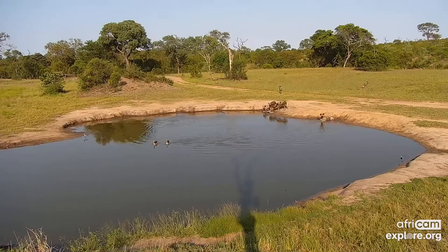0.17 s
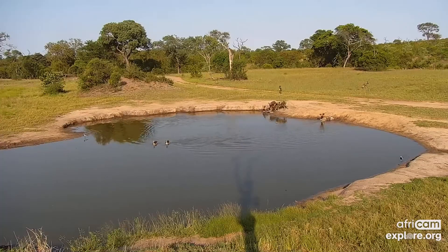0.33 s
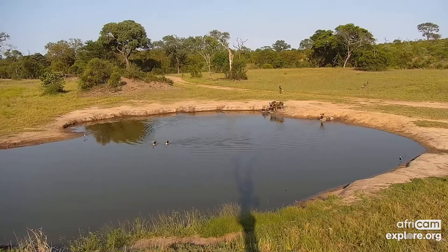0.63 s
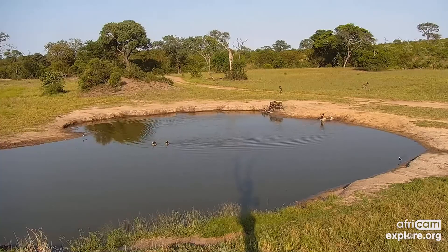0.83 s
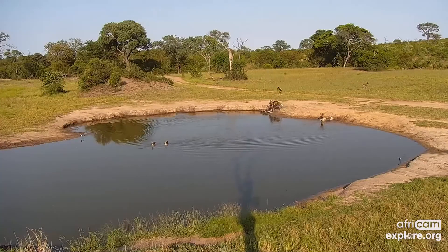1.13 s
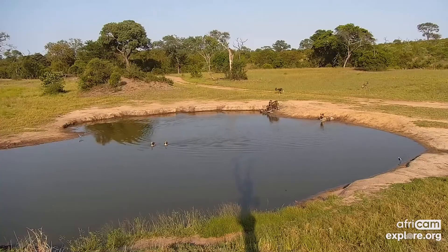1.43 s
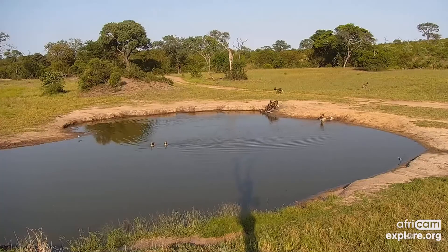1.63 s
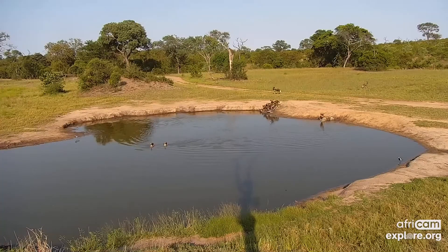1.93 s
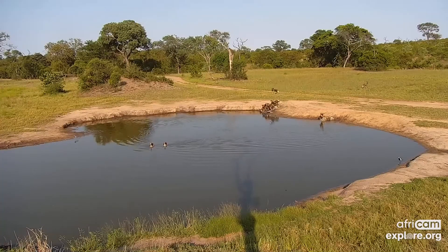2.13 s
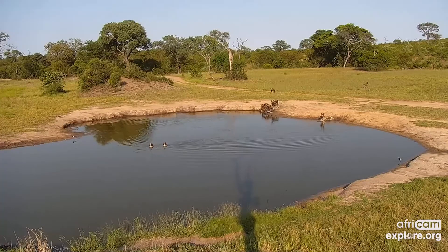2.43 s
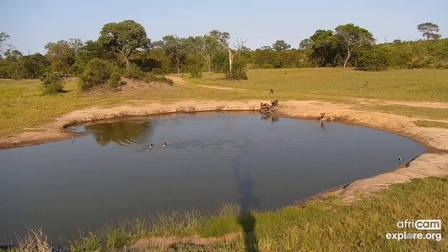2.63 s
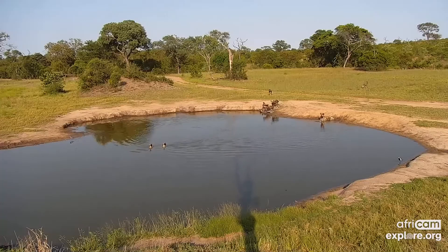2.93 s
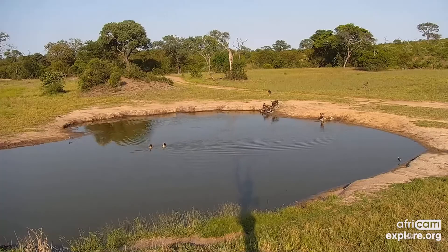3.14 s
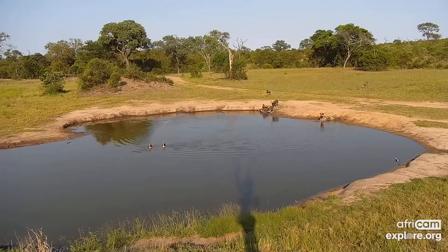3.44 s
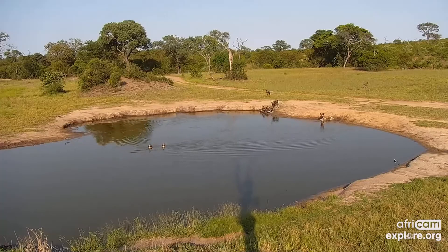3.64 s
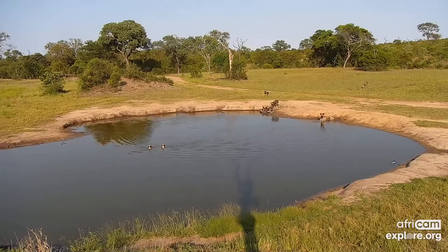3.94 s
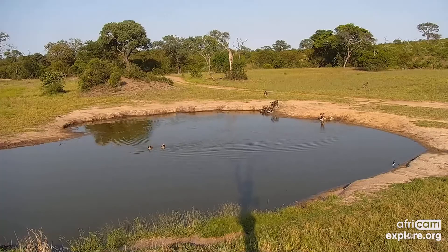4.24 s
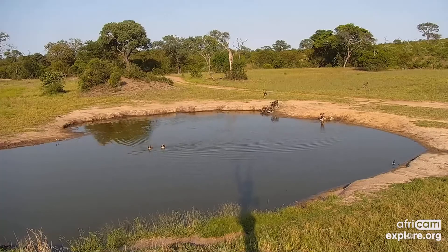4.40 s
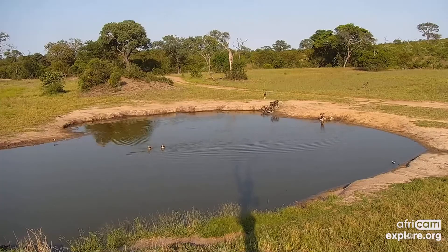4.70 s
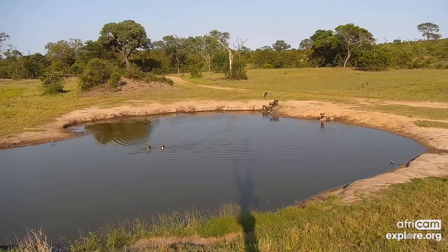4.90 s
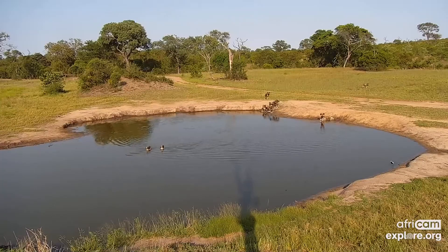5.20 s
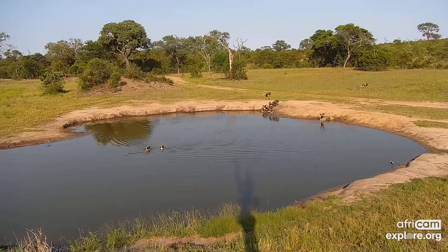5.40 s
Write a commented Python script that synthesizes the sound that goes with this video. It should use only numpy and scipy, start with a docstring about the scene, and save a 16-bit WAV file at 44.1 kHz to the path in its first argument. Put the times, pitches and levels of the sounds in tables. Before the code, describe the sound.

Wild dogs twitter far off at a waterhole, with rustling, splashy clicks, drips and high whistles over a steady low hum.

```python
"""Rustling, splashy clicks and thin chirps: a pack of wild dogs at a waterhole, on a distant microphone.
Bubbles ring as drips, a hoarse squeal passes, and far twitter runs throughout. Three falling whistles
and a raspy trill follow, then three long high whistles and a low croak. Ground and water scatter a thin
echo of the short sounds; the cable adds mains hum, low rumble and hiss."""
import sys
import numpy as np
from scipy import signal
from scipy.fft import rfft, irfft
from scipy.io import wavfile
from scipy.ndimage import uniform_filter1d

SR = 44100
rng = np.random.default_rng(int(sys.argv[2]) if len(sys.argv) > 2 else 0)


def dump_mix(stems):
    """Bounce the given channels to the path in sys.argv[1] as a 16-bit WAV at rate SR."""
    frames = np.atleast_2d(stems).T  # one column per channel
    limited = np.clip(frames, -1, 1)  # hard clip at full scale
    pcm = np.round(limited * 32767).astype(np.int16)
    wavfile.write(sys.argv[1], SR, pcm)


N = 245189

# stir of grass and water around the pack: t/s, level/dB
RUSTLE_LEVEL = [(0, -47), (.15, -52), (.32, -62), (.38, -55), (.66, -55.5), (.72, -67), (1.1, -63),
                (1.3, -63), (1.85, -67.5), (2.0, -64.5), (2.62, -68), (2.85, -59.5), (2.95, -63),
                (3.5, -59.5), (3.7, -70), (4.0, -68), (4.55, -63.5), (5.56, -68)]
# colour that the microphone gives to broad sounds: f/Hz, gain/dB
MIC_COLOUR = [(300, -26), (700, -13), (1500, -13.5), (2800, -12), (3400, -8), (3750, 0), (4300, -5.5),
              (5500, -6.5), (7000, -10.5), (7700, -24.5), (11000, -30.5)]


def gain_of(db):
    return 10 ** (np.asarray(db) / 20)


def unit_rms(x):
    return x / np.sqrt(np.mean(x ** 2) + 1e-20)


def add(mix, start_s, sound):
    part = mix[round(start_s * SR):][:len(sound)]
    part += sound[:len(part)]


def sine(hz):
    return np.sin(2 * np.pi * np.cumsum(hz) / SR)


def coloured(x, spectrum):
    """Filters x by a spectrum: f/Hz, gain/dB."""
    bins = np.fft.rfftfreq(len(x), 1 / SR) + 1
    hz, db = np.transpose(spectrum)
    return irfft(rfft(x) * gain_of(np.interp(np.log(bins), np.log(hz), db)), len(x))


def resonate(x, hz, width_hz):
    """A resonance: shifts hz down to zero, smooths, and shifts back."""
    turn = np.exp(2j * np.pi * np.cumsum(hz * np.ones(len(x))) / SR)
    pole = np.exp(-np.pi * width_hz / SR)
    return 2 * (turn * signal.lfilter([1 - pole], [1, -pole], x / turn)).real


def narrow_noise(hz, width_hz):
    """Noise through a resonance twice: a fuzzy whistle on the curve hz."""
    once = resonate(rng.standard_normal(len(hz)), hz, width_hz)
    return unit_rms(resonate(once, hz, width_hz))


def wander(count, span):
    """Smooth random drift of rms 1 that changes within span samples."""
    return unit_rms(uniform_filter1d(uniform_filter1d(rng.standard_normal(count), span), span))


def grains(count, spread_db, limit):
    """Gritty noise: each sample gets a random boost of up to limit times spread_db."""
    return gain_of(spread_db * np.minimum(rng.exponential(1, count), limit)) * rng.standard_normal(count)


def unfold(contour):
    """Turns rows of t/s, f/Hz, level/dB into a start time, a pitch curve and a gain curve."""
    times, hz, db = np.transpose(contour)
    t = np.arange(times[0], times[-1], 1 / SR)
    return times[0], np.interp(t, times, hz), gain_of(np.interp(t, times, db))


def glide(length_s, first_hz, last_hz, db, waver, rasp_db=2.7):
    """A short sliding tone whose pitch and level tremble."""
    count = round(length_s * SR)
    hz = np.linspace(first_hz, last_hz, count) * (1 + waver * wander(count, 40))
    return gain_of(db + rasp_db * wander(count, 60)) * signal.windows.tukey(count, .6) * sine(hz)


def sing(hz, level, flutter_db):
    """A tone on a pitch curve whose level flutters."""
    return np.sqrt(2) * level * gain_of(flutter_db * wander(len(hz), 150)) * sine(hz)


def rustle():
    """Grass and water crackle in lumps; the louder, nearer rustle breaks into snaps."""
    db = np.interp(np.arange(N) / SR, *np.transpose(RUSTLE_LEVEL))
    crackle = grains(N, spread_db=1.9, limit=5)
    snap_db = np.interp(db, [-62, -56], [2.2, 3.2])
    lumps = gain_of(snap_db * wander(N, 120) + 1.8 * wander(N, 900))
    return unit_rms(coloured(crackle * lumps, MIC_COLOUR)) * gain_of(db)


def cable(mains_hz=50.135):
    """The microphone line: mains hum with odd overtones, a wavering second harmonic, rumble and hiss."""
    # mains harmonics: multiple, rms level/dB
    harmonics = [(1, -45), (3, -64), (5, -85), (7, -84)]
    # rumble and hiss: f/Hz, density/(dB per Hz)
    noise_floor = [(20, -104), (40, -86), (65, -71), (100, -79), (140, -89), (180, -92), (260, -106),
                   (420, -102), (1000, -102), (2000, -104), (4000, -105), (7500, -106), (10800, -101)]
    t = np.arange(N) / SR
    hum = sum(np.sqrt(2) * gain_of(db) * np.sin(2 * np.pi * (k * mains_hz * t + rng.random()))
              for k, db in harmonics)
    second = gain_of(-66.5) * narrow_noise(np.full(N, 2 * mains_hz), width_hz=2)
    return hum + second + coloured(rng.standard_normal(N), noise_floor) * np.sqrt(SR / 2)


def far_twitter(count=400):
    """Dogs farther off: a blur of faint chirps whose level loosely follows the rustle."""
    out = np.zeros(N)
    for when, length, pitch, bend, loud in rng.random((count, 5)):
        start = when * N / SR
        hz = 3450 + 1500 * pitch ** 1.8
        rustle_db = np.interp(start, *np.transpose(RUSTLE_LEVEL))
        db = np.clip(rustle_db, -66, -61) - 5.5 + 5 * loud
        add(out, start, glide(.0072 + .0444 * length, hz, hz + 400 * (bend - .5), db, waver=.032))
    return out


def clicks(crest_factor=1.9):
    """Paws and water click and slap: scatters of noise grains that swell and die, with a faint tail."""
    # impacts: t/s, nominal peak level/dB, length/s, centre f/Hz
    impacts = [(.008, -29, 0.0051, 3020), (0.078, -33, 0.0029, 4950), (.119, -21.5, 0.0041, 4200),
               (0.127, -34.5, 0.012, 2370), (0.289, -34, 0.012, 5840), (0.306, -35, .005, 5600),
               (0.335, -38, 0.0067, 3400), (0.356, -39, 0.0052, 4500), (0.451, -45, 0.0065, 4500),
               (0.628, -37, 0.0078, 4300), (1.432, -42, 0.0041, 4500), (2.565, -49.5, 0.0047, 1500),
               (3.336, -45, 0.007, 2300), (4.759, -46.5, 0.011, 3500), (5.134, -45, 0.011, 4700)]
    out, t = np.zeros(N), np.arange(3000) / SR
    for start, db, length, hz in impacts:
        swell = np.exp(-((t / length - .5) / .52) ** 2)
        envelope = swell + .1 * np.tanh(t / length) * np.exp(-t / .018)
        grit = coloured(grains(len(t), spread_db=5, limit=4), MIC_COLOUR)
        burst = envelope * (unit_rms(resonate(grit, hz, width_hz=2100)) + .29 * unit_rms(grit))
        rms = gain_of(db) * np.sqrt(np.mean(envelope ** 2)) / crest_factor
        add(out, start, rms * unit_rms(burst))
    return out


def slides():
    """Short sliding tones: thin high chirps, a low call and two longer rising water drips."""
    # tones: t/s, length/s, first f/Hz, last f/Hz, level/dB
    tones = [(0.023, 0.022, 877, 1190, -49), (0.587, 0.021, 1000, 1290, -59),
             (0.546, 0.018, 6640, 7060, -55), (0.584, 0.014, 4480, 4650, -44),
             (0.132, .017, 3650, 3730, -41), (0.479, 0.0074, 3550, 3700, -45.5),
             (.514, .013, 3600, 3640, -46.5), (.599, .008, 3900, 3550, -43.5),
             (0.799, 0.054, 4000, 3944, -58), (0.86, 0.06, 4300, 4550, -62.5),
             (0.864, 0.045, 3350, 3380, -65.5), (0.946, 0.039, 3740, 3760, -60),
             (0.957, 0.036, 4930, 4620, -59.5), (0.98, 0.057, 3950, 4020, -56),
             (1.034, 0.05, 4330, 4400, -57.5), (1.075, 0.045, 4540, 4330, -58),
             (1.365, 0.035, 4063, 3630, -59), (2.556, 0.0093, 3690, 3640, -52.5),
             (2.615, 0.079, 910, 880, -66.5), (2.639, 0.105, 7170, 7550, -64),
             (3.986, 0.0236, 4700, 4640, -64), (4.03, 0.024, 4650, 4790, -62),
             (4.066, 0.036, 4540, 4310, -63), (4.152, 0.0387, 3675, 3920, -55),
             (4.185, 0.052, 5660, 5340, -59), (4.321, 0.057, 3500, 3870, -61),
             (4.439, 0.037, 4450, 3410, -61), (4.501, 0.026, 3950, 4180, -56.5),
             (4.52, 0.073, 3700, 3900, -61), (4.54, 0.035, 4180, 4330, -63),
             (4.582, 0.026, 4400, 4270, -60), (4.669, 0.024, 4587, 4640, -57),
             (4.787, 0.025, 4450, 3870, -58), (5.018, .009, 3800, 4450, -53),
             (5.039, .008, 3950, 4800, -55), (5.167, 0.062, 4000, 4120, -57.5),
             (5.348, 0.0196, 4660, 4900, -59)]
    out = np.zeros(N)
    for start, length, first_hz, last_hz, db in tones:
        add(out, start, glide(length, first_hz, last_hz, db, waver=.009, rasp_db=3))
    return out


def drips():
    """Drips at the waterhole: each bubble rises in pitch as it dies away."""
    # bubbles: t/s, first f/Hz, level/dB before the decay
    bubbles = [(0.064, 1504, -44), (0.077, 1510, -47), (0.366, 1440, -45.5), (0.45, 1550, -44),
               (0.478, 566, -52.5), (0.516, 1546, -44.5), (0.573, 1540, -46), (0.653, 1390, -50),
               (.679, 1300, -52), (.73, 1490, -53.5), (2.564, 1290, -54)]
    out = np.zeros(N)
    for start, hz, db in bubbles:
        ring = glide(rng.uniform(.006, .01), hz, 1.13 * hz, db, waver=.04)
        add(out, start, ring * gain_of(np.linspace(1, -8, len(ring))))
    return out


def squeal():
    """One hoarse squeal: a trembling tone in a breathy band of noise."""
    # course of the squeal: t/s, f/Hz, level/dB
    contour = [(.16, 5000, -46), (.172, 4880, -41.5), (.197, 4740, -40.5), (.225, 5080, -41),
               (.256, 5250, -43), (.268, 4520, -52), (.28, 4650, -45), (.293, 4700, -54)]
    out = np.zeros(N)
    start, hz, level = unfold(contour)
    voice = sing(hz + 130 * wander(len(hz), 40), level, flutter_db=2)
    breath = level * gain_of(-4.5) * narrow_noise(hz - 300, width_hz=1300)
    add(out, start, voice + breath)
    return out


def hiss_swells():
    """Raspy bursts of hiss swell out of the rustle and fade."""
    # bursts: t/s, length/s, centre f/Hz, level/dB
    bursts = [(1.206, 0.098, 4300, -60), (2.259, 0.051, 4730, -61), (2.485, 0.073, 3970, -61),
              (3.246, 0.25, 5250, -58), (3.81, 0.11, 3900, -64)]
    out = np.zeros(N)
    for start, length, hz, db in bursts:
        count = round(length * SR)
        add(out, start, gain_of(db) * np.hanning(count) * narrow_noise(np.full(count, hz), width_hz=1500))
    return out


def falling_whistles(length_s=.135, top_hz=3350, goal_hz=1300, sink_s=.19, attack_s=.028, fade_db=-10):
    """Faint fluttering whistles that fade as they sink, ever more slowly, towards a low pitch."""
    # whistles: t/s, level/dB
    whistles = [(2.335, -71), (2.719, -65.5), (3.011, -64.5)]
    out, t = np.zeros(N), np.arange(0, length_s, 1 / SR)
    hz = goal_hz + (top_hz - goal_hz) * np.exp(-t / sink_s)
    envelope = np.minimum(t / attack_s, 1) * gain_of(fade_db * (t / length_s) ** 3)
    for start, db in whistles:
        add(out, start, sing(hz, gain_of(db) * envelope, flutter_db=4.5))
    return out


def trill(start_s=3.392, gap_s=.0472, slowing_s=.00045, loudest_s=3.57, spread_s=.19, count=8):
    """A run of raspy notes, each a little off in pitch, that slows slightly and swells to its middle."""
    # one note, a quick rise to a crest: t/s from the crest, f/Hz, level/dB relative to the crest
    contour = [(-.032, 2350, -32), (-.021, 2750, -13), (-.015, 3100, -29), (-.005, 3700, -9), (0, 3820, 0),
               (.007, 3600, -6), (.014, 3300, -22)]
    out = np.zeros(N)
    lead_s, hz, envelope = unfold(contour)
    for k, detune in enumerate(rng.standard_normal(count)):
        crest_s = start_s + gap_s * k + slowing_s * k ** 2
        pitch = hz * (1 + .005 * detune + .012 * wander(len(hz), 40))
        db = -49.5 - 10.5 * ((crest_s - loudest_s) / spread_s) ** 4
        add(out, crest_s + lead_s, sing(pitch, gain_of(db) * envelope, flutter_db=2))
    return out


def long_whistles(attack_s=.015):
    """Three swelling whistles across the water, with a fuzzy upper sideband from a second vibration."""
    # one curve a whistle, a scoop up to a held note and a drop near the end: t/s, f/Hz
    contours = [
        [(4.6, 6600), (4.618, 6760), (4.63, 6960), (4.664, 6980), (4.725, 7080), (4.741, 6960), (4.743, 6690),
         (4.752, 6740), (4.754, 6980), (4.763, 6980)],
        [(4.935, 6250), (4.948, 6600), (4.96, 7200), (4.99, 7350), (5.055, 7095), (5.16, 7065), (5.168, 6740),
         (5.178, 6700)],
        [(5.35, 5300), (5.363, 5850), (5.39, 6680), (5.42, 7020), (5.485, 7095), (5.546, 7200), (5.56, 6800)],
    ]
    # effort behind each whistle: first level/dB, last level/dB, fade-out/s
    efforts = [(-56, -36, 0.0065), (-55.5, -46.5, 0.018), (-56.5, -52, 0.0021)]
    # some pitches carry over the water better than others: f/Hz, gain/dB
    carry = [(5300, -12), (5850, 3), (6200, -7), (6700, 8), (6880, -11), (6970, -8.5), (7080, 0),
             (7350, -6)]
    out = np.zeros(N)
    for contour, (first_db, last_db, fade_s) in zip(contours, efforts):
        times, pitch = np.transpose(contour)
        t = np.arange(times[0], times[-1], 1 / SR)
        hz = np.interp(t, times, pitch)
        edges = np.clip(np.minimum((t - times[0]) / attack_s, (times[-1] - t) / fade_s), 0, 1)
        db = np.linspace(first_db, last_db, len(t)) + np.interp(hz, *np.transpose(carry))
        tone = np.sqrt(2) * sine(hz + 12 * wander(len(t), 60))
        level = uniform_filter1d(edges * gain_of(db), 30) * gain_of(1.5 * wander(len(t), 60))
        sideband = gain_of(-14) * narrow_noise(hz + 360, width_hz=410)
        add(out, times[0], level * (tone + sideband))
    return out


def croak(start_s=4.808, pips_per_s=34.4, count=20):
    """Evenly spaced short pips from a low throat, each a little off in pitch."""
    out = np.zeros(N)
    for k, (detune, loud) in enumerate(rng.standard_normal((count, 2))):
        hz = 915 + 30 * detune
        pip = glide(.015, hz - 150, hz + 60, db=-63.5 + loud, waver=.06, rasp_db=2)
        add(out, start_s + k / pips_per_s, pip)
    return out


def bank_echoes(x, delay_s=.003, decay_s=.12):
    """Thin scattered echoes that reach the microphone off the ground and water."""
    t = np.arange(4000) / SR
    tail = rng.standard_normal(len(t)) * gain_of(-60 * t / decay_s) * (t > delay_s)
    return signal.oaconvolve(x, tail / np.linalg.norm(tail))[:N]


def scene():
    """The waterhole from one distant outdoor microphone, the same on both channels."""
    bed = rustle() + cable() + hiss_swells()
    short_sounds = far_twitter() + clicks() + slides() + drips() + falling_whistles() + trill() + croak()
    mono = bed + short_sounds + gain_of(-7.5) * bank_echoes(short_sounds) + squeal() + long_whistles()
    return np.array([mono, mono])


def record(dry, cutoff_hz=11200):
    """A steep band limit takes off the top treble."""
    lowpass = signal.firwin(501, cutoff_hz, window=("kaiser", 6), fs=SR)
    return signal.oaconvolve(dry, lowpass[None], "same")


dry = scene()
out = record(dry)
dump_mix(out)
```